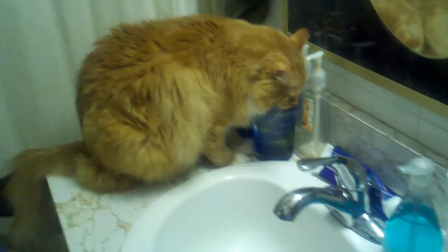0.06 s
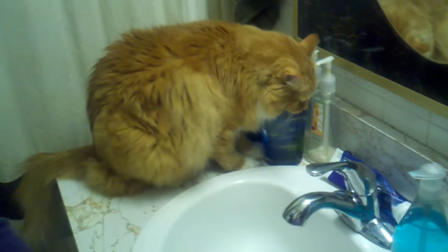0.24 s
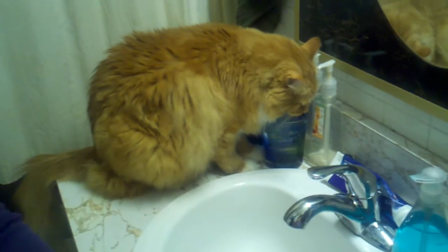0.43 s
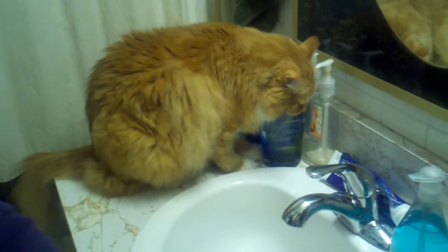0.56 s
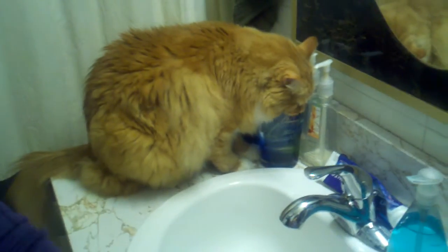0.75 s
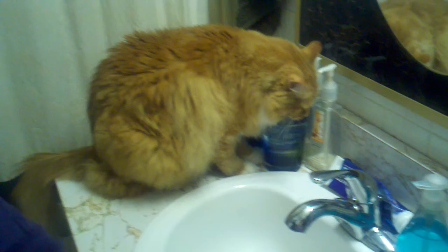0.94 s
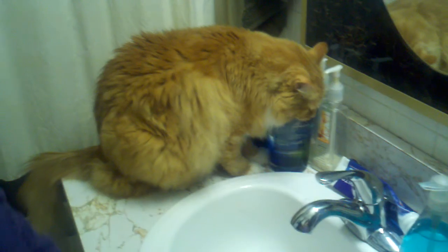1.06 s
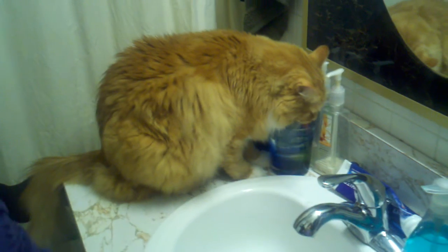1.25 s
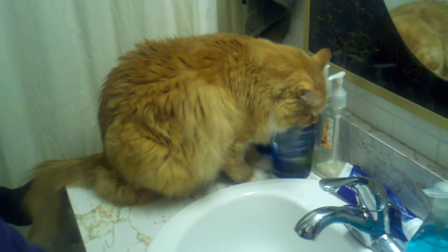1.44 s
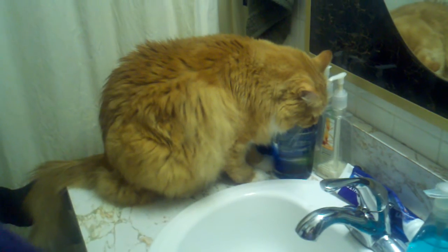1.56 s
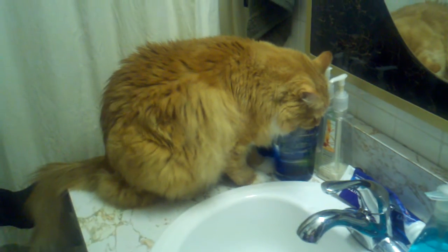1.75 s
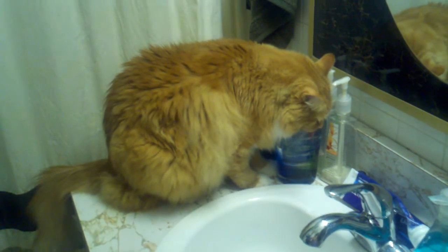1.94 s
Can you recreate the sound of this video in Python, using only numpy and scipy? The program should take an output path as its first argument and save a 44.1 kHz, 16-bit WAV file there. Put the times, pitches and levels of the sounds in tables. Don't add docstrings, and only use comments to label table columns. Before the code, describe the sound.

A cat laps water from a glass, with uneven clusters of bubbly plops, wet snaps and pinging droplets. A small tiled bathroom adds a short bright tail; the nearby microphone has soft hiss and catches one late dry tick.

```python
import sys
import numpy as np
from scipy import signal
from scipy.fft import rfft, irfft
from scipy.io import wavfile
from scipy.ndimage import uniform_filter1d

SR = 44100
rng = np.random.default_rng(int(sys.argv[2]) if len(sys.argv) > 2 else 0)


def store_pcm(level_fs):
    pcm = np.round(np.clip(level_fs, -1, 1) * 32767).astype(np.int16)
    wavfile.write(sys.argv[1], SR, np.atleast_2d(pcm).T)


def invert_db(x):
    u = np.asarray(x, float) / 20
    return 10 ** u


N = 88200
LEAD = SR // 5
WATER_CUT_HZ = 590


def rms_one(x):
    return x / np.sqrt(np.mean(x ** 2) + 1e-20)


def fade(t, t60):
    return np.exp(-np.log(1000) * t / max(t60, 1e-3))


def swell(t, attack, t60):
    return (1 - np.exp(-t / attack)) * fade(t, t60)


def high_pass(x, hz, order):
    return signal.sosfilt(signal.butter(order, hz, "high", fs=SR, output="sos"), x)


def resonate(x, peaks):
    out = 0
    for k, (hz, width, db) in enumerate(peaks):
        r = np.exp(-np.pi * width / SR)
        zeros = [(1 - r * r) / 2, 0, (r * r - 1) / 2]
        poles = [1, -2 * r * np.cos(2 * np.pi * hz / SR), r * r]
        out = out + (-1) ** k * invert_db(db) * signal.lfilter(zeros, poles, x + 1e-18)
    return out


def add(track, start_s, sound):
    i = int(start_s * SR) + LEAD
    track[i:i + len(sound)] += sound[:len(track) - i]


# (pitch_hz, level_db)
HISS_COLOUR = [(29, -22), (50, -16), (125, -6), (371, -2.5), (973, -11.5), (3300, -17), (4560, -21.5),
               (16000, -22)]
# (pitch_hz, level_db)
WHINES = [(1755, -81), (2412, -80.5), (3402, -80.5)]
HISS_DB, WHINE_WIDTH_HZ = -66.5, 30


def background():
    hz = np.maximum(np.arange(N // 2 + 1) * SR / N, 1)
    colour_hz, colour_db = np.transpose(HISS_COLOUR)
    colour = invert_db(np.interp(np.log(hz), np.log(colour_hz), colour_db))
    hiss = irfft(rfft(rng.standard_normal(N)) * colour, N)
    out = invert_db(HISS_DB) * rms_one(hiss)
    for pitch_hz, level_db in WHINES:
        peak = [(pitch_hz, WHINE_WIDTH_HZ, 0)]
        whine = resonate(resonate(rng.standard_normal(N), peak), peak)
        out = out + invert_db(level_db) * rms_one(whine)
    return out


PLOP_CYCLES, PLOP_ATTACK_S, PLOP_RISE = 11.44, 0.001, 0.041


def air_pocket(pitch_hz, t60):
    t = np.arange(SR // 10) / SR
    return swell(t, PLOP_ATTACK_S, t60) * np.sin(2 * np.pi * pitch_hz * (t + PLOP_RISE * t ** 2 / t60))


# (start_s, level_db, pitch_hz, splash_db)
PLOPS = [(0.151, -43.5, 850, -11.5), (0.175, -35.5, 1050, -4), (0.19, -37, 1350, -0.5),
         (0.204, -34.5, 844, -2.5), (0.214, -29, 1760, -27), (0.234, -17.5, 1900, -4.5),
         (0.251, -21, 1830, -10.5), (0.274, -36.5, 1290, 7.5), (0.288, -28.5, 1680, -3),
         (0.297, -15.5, 1120, -15.5), (0.303, -23.5, 1640, -3), (0.305, -28, 1770, -7),
         (0.3168, -19, 1850, -11), (0.378, -28, 1770, -14), (0.417, -35.5, 1930, -11),
         (0.4355, -31.5, 1460, -3.5), (0.502, -37, 1780, -9), (0.607, -38.5, 1010, 0),
         (0.637, -31, 1480, -6.5), (0.689, -25.5, 1550, -9.5), (0.701, -25, 1110, -5),
         (0.7115, -25.5, 1020, -3), (0.812, -37, 1120, 5), (0.823, -19, 1767, -16),
         (0.976, -44, 1610, -2), (1.002, -29, 846, -8), (1.04, -57.5, 810, 15),
               (1.112, -44, 1410, -7), (1.143, -28.5, 875, -3.5), (1.201, -27.5, 1230, -7),
               (1.229, -38, 1300, -5), (1.256, -45, 912, 5), (1.28, -41.5, 880, 3),
               (1.295, -29.5, 2140, -5.5), (1.306, -41.5, 2130, 0), (1.328, -27, 2430, -16),
               (1.338, -40.5, 1075, 2), (1.354, -39.5, 1140, 0.5), (1.367, -31, 2200, -3),
               (1.393, -45.5, 747, 10.5), (1.412, -43, 1310, 3), (1.479, -31.5, 857, 1),
               (1.489, -33.5, 1820, -3.5), (1.53, -34, 890, -2.5), (1.544, -22, 1640, -5),
               (1.57, -31.5, 1940, -2.5), (1.661, -46, 712, 3.5), (1.697, -44, 723, -2),
               (1.77, -53, 730, 6.5),
         (0.2278, -17, 1750, -10.5),
    (0.321, -25, 1730, -7.5),
    (0.646, -41, 1270, 4),
    (0.679, -35, 1000, 2),
    (0.719, -30.5, 1050, -35),
    (1.062, -48.5, 2290, -5.5),
    (1.181, -40.5, 2300, -14),
    (1.558, -36, 1300, 1.5),
    (1.590, -49, 1060, 10.5),
    (0.611, -50, 3600, 8),
]
# (pitch_hz, width_hz, level_db)
LOW_GLASS_AIR = [(834, 200, -4), (1310, 290, -3), (1750, 860, -2), (2200, 996, -4.5)]
EARLIER_LAP = (-0.14, -4, 1190, 0)
PLOP_TRIM_DB, OVERTONE_DB, OVERTONE_RATIO = 4, -32, 1.67
CHURN_WIDTH, CHURN_DB = 0.17, 1.5
SPLASH_T60_S, SPLASH_ATTACK_S, SPLASH_DB, SPLASH_LUMP_DB = 0.056, 0.0011, -1.5, 1
SLOSH_HZ, SLOSH_WIDTH_HZ, SLOSH_DB, SLOSH_T60_S, SLOSH_ATTACK_S = 305, 470, -20.5, 0.087, 0.0073


def plops():
    out, splash, slosh = np.zeros((3, N + LEAD))
    rows = PLOPS + [EARLIER_LAP]
    t = np.arange(SR // 10) / SR
    for start_s, level_db, pitch_hz, splash_db in rows:
        gain, t60 = invert_db(level_db + PLOP_TRIM_DB), PLOP_CYCLES / pitch_hz
        overtone = invert_db(OVERTONE_DB) * air_pocket(pitch_hz * OVERTONE_RATIO, t60 / 2)
        add(out, start_s, gain * (air_pocket(pitch_hz, t60) + overtone))
        add(slosh, start_s, gain * invert_db(SLOSH_DB) * swell(t, SLOSH_ATTACK_S, SLOSH_T60_S))
        burst = gain * invert_db(splash_db) * swell(t, SPLASH_ATTACK_S, SPLASH_T60_S)
        add(splash, start_s, burst * invert_db(SPLASH_DB))
        churn = burst * rng.standard_normal(len(t))
        add(out, start_s, 2 * resonate(churn, [(pitch_hz, CHURN_WIDTH * pitch_hz, CHURN_DB)]))
    lumps = invert_db(SPLASH_LUMP_DB * rms_one(uniform_filter1d(rng.standard_normal(N + LEAD), size=130)))
    out = out + 2 * resonate(splash * lumps * rng.standard_normal(N + LEAD), LOW_GLASS_AIR)
    body = [(SLOSH_HZ, SLOSH_WIDTH_HZ, 0)]
    dull = resonate(resonate(slosh * rng.standard_normal(N + LEAD), body), body)
    return high_pass(out, WATER_CUT_HZ, order=4) + dull


# (start_s, level_db, spray_db above the glass ring)
SNAPS = [(0.1476, -44.5, -9), (0.174, -40.5, -21), (0.1804, -44, -4.5), (0.192, -45, -21),
         (0.2065, -33.5, -17), (0.2142, -45, -3), (0.228, -26, -31), (0.244, -25, -9),
         (0.273, -28.5, -12), (0.3015, -26, -15), (0.3163, -34, -4.5), (0.367, -46, -3),
         (0.377, -36.5, -8), (0.4348, -37.5, -14), (0.606, -51, 3), (0.625, -42.5, -11),
         (0.636, -41, -8.5), (0.6665, -37.5, -14), (0.6711, -38, -22), (0.6862, -27, 2.5),
         (0.7004, -53, -22), (0.8125, -38, -25), (0.8225, -34.5, -14),
         (1, -35, -20), (1.0192, -45.5, -3), (1.11, -52, -9), (1.1374, -55, -17),
               (1.1421, -39.5, -39), (1.2006, -29.5, -11), (1.204, -64, -24), (1.222, -48, -27),
               (1.294, -34, -8), (1.3064, -39.5, -14), (1.328, -36, -8), (1.341, -37, -18),
               (1.367, -36, -11.5), (1.384, -39, -15), (1.3963, -43, -11), (1.4382, -41.5, -15.5),
               (1.4661, -46, -13), (1.478, -42, -16), (1.4913, -40.5, -23), (1.5266, -50, -15),
               (1.542, -37.5, -14), (1.5484, -22, -7.5), (1.646, -50, 9.5),
         (0.236, -28, -4),
    (0.291, -38, -2.5),
    (.322, -33, -29),
    (0.61, -56, 3),
    (0.861, -48, -20),
    (1.559, -32.5, -3.5),
]
# (pitch_hz, width_hz, level_db)
HIGH_GLASS_AIR = [(3070, 810, -4.5), (3710, 383, 2.5), (4400, 590, 0.87), (5510, 1630, -17.5)]
# (pitch_hz, width_hz, level_db)
SPRAY_COLOUR = [(7000, 900, 3), (9560, 1320, 0), (11170, 2600, -5.5), (15900, 2200, -10.5)]
SNAP_T60_S, SPRAY_T60_S, SNAP_TRIM_DB, SPRAY_TRIM_DB = 0.012, 0.012, 4.5, 8.5
SNAP_ATTACK_S, BREAK_DB = 0.00078, 8.5
CRACKLE_DB, CRACKLE_T60_S, CRACKLES_PER_S = -14.5, 0.08, 1080


def snaps():
    ring, spray = np.zeros((2, N + LEAD))
    t = np.arange(SR // 10) / SR
    rise = 1 - np.exp(-t / SNAP_ATTACK_S)
    first_break = invert_db(BREAK_DB) * (np.arange(len(t)) == SR // 2000)
    for start_s, level_db, spray_db in SNAPS:
        ring_noise, spray_noise = rng.standard_normal((2, len(t)))
        crackles = rng.random(len(t)) < CRACKLES_PER_S / SR
        grains = signal.lfilter([1], [1, -.97], crackles)
        trail = invert_db(CRACKLE_DB) * grains * fade(t, CRACKLE_T60_S)
        ring_shape = first_break + rise * (fade(t, SNAP_T60_S) + trail)
        spray_shape = first_break / 2 + rise * (fade(t, SPRAY_T60_S) + trail)
        add(ring, start_s, invert_db(level_db + SNAP_TRIM_DB) * ring_shape * ring_noise)
        add(spray, start_s, invert_db(level_db + spray_db + SPRAY_TRIM_DB) * spray_shape * spray_noise)
    ringing = high_pass(resonate(ring, HIGH_GLASS_AIR) * 2, 1300, order=2)
    return ringing + high_pass(resonate(spray, SPRAY_COLOUR), 5350, order=2)


# (start_s, level_db, pitch_hz, fade_cycles)
DROPS = [(.2303, -27, 4350, 16), (.2385, -30, 1920, 12), (.2458, -23, 3900, 12),
         (.2742, -28, 3720, 29), (.3085, -14, 1780, 13), (0.313, -22, 1500, 7.1),
         (0.315, -25, 4400, 14), (.322, -25.5, 4230, 18), (.3245, -38, 1990, 17),
         (0.329, -16, 1300, 4.6), (0.4269, -41, 1160, 16), (0.436, -42, 2140, 19),
         (.444, -37, 1920, 15), (.460, -32, 3800, 10), (0.506, -39, 1800, 14), (0.666, -45, 3600, 12),
         (0.672, -41, 3800, 18), (.682, -38, 3900, 13), (.606, -44, 3800, 91),
         (.609, -28.5, 1050, 6.4), (.638, -42, 3850, 14), (0.712, -23, 1040, 7.5),
         (.8145, -48, 4200, 16), (0.815, -34.5, 7000, 25), (.8235, -42, 4430, 21),
         (.701, -28, 3920, 14), (0.7154, -32, 1130, 8), (.7255, -30, 1140, 7.1),
         (1.2954, -29, 4150, 13), (1.3082, -50, 4200, 12), (1.002, -31, 3580, 17),
               (1.18, -53, 2300, 15), (1.2002, -27, 4400, 11), (1.3285, -28.5, 7600, 23),
               (1.3412, -34.5, 4200, 14), (1.3675, -28, 4540, 18), (1.367, -36, 7140, 23),
               (1.374, -40, 2200, 15), (1.384, -34.5, 7000, 26), (1.5493, -21, 4300, 9),
               (1.482, -28, 1730, 9), (1.663, -47, 706, 40),
         (.3016, -16, 1900, 6),
    (.3017, -24, 4300, 16),
    (.6856, -21, 4000, 18),
    (.6857, -23, 7200, 24),
    (.6858, -25, 9800, 28),
    (.6859, -28, 14000, 36),
    (1.3283, -31, 5000, 18),
    (1.647, -39, 7200, 25),
    (1.6472, -45, 5400, 14),
    (1.7712, -48, 850, 14),
]
DROP_ATTACK_S, DROP_RISE = .0003, .05


def drops():
    out, t = np.zeros(N + LEAD), np.arange(SR // 20) / SR
    for start_s, level_db, pitch_hz, fade_cycles in DROPS:
        t60 = fade_cycles / pitch_hz
        ping = np.sin(2 * np.pi * pitch_hz * t * (1 + DROP_RISE * t / t60))
        add(out, start_s, invert_db(level_db) * swell(t, DROP_ATTACK_S, t60) * ping)
    return high_pass(out, WATER_CUT_HZ, order=2)


# (low_hz, high_hz, level_db, t60_s)
TILE_BANDS = [(144, 400, -2.5, 0.21), (717, 1010, -5.5, 0.24), (1250, 2200, -5, 0.22),
              (2940, 4600, -7.5, 0.23), (5470, 21000, -6.5, 0.19)]
ROOM_GAP_S, ECHO_PATCHY_DB = .0045, 3


def bathroom(x):
    t = np.arange(SR // 2) / SR
    lumps = invert_db(ECHO_PATCHY_DB * rms_one(uniform_filter1d(rng.standard_normal(len(t)), size=90)))
    onset = np.clip(t / ROOM_GAP_S - 1, 0, 1)
    mean_fade = fade(t, .28)
    spectrum = rfft(rng.standard_normal(len(t)) * lumps * onset * mean_fade)
    even = irfft(spectrum / np.sqrt(uniform_filter1d(np.abs(spectrum) ** 2, size=11)), len(t))
    echoes = even * onset * (t < .4) / np.sqrt(np.sum(even ** 2))
    tail = 0
    for low_hz, high_hz, level_db, t60 in TILE_BANDS:
        band = signal.butter(2, [low_hz, high_hz], "band", fs=SR, output="sos")
        tail = tail + invert_db(level_db) * fade(t, t60) / mean_fade * signal.sosfilt(band, echoes)
    return signal.fftconvolve(x, tail)[:len(x)]


# (pitch_hz, level_db, t60_s)
TICK_MODES = [(1300, -16, 0.0036), (1920, 9.5, 0.0042), (2300, 2, 0.0052), (3010, 1, 0.0062),
              (3800, -5.5, 0.0058), (4200, -7, 0.01), (5200, -6, 0.003), (5860, -4, 0.0024),
              (7250, -8.5, 0.0049), (9100, -4, .002)]
TICK_S, TICK_DB, TICK_ATTACK_S, TICK_CUT_HZ = 1.7427, -23.5, 0.00021, 510


def tick():
    out, t = np.zeros(N + LEAD), np.arange(SR // 40) / SR
    for k, (pitch_hz, level_db, t60) in enumerate(TICK_MODES):
        mode = swell(t, TICK_ATTACK_S, t60) * np.sin(2 * np.pi * pitch_hz * t)
        add(out, TICK_S, (-1) ** k * invert_db(TICK_DB + level_db) * mode)
    return high_pass(out[LEAD:], TICK_CUT_HZ, order=2)


def scene():
    glass = plops() + snaps() + drops()
    in_room = (glass + bathroom(glass))[LEAD:]
    return (in_room + tick() + background())[None]


def low_pass(x):
    return signal.sosfilt(signal.butter(12, 16650, fs=SR, output="sos"), x)


def record(dry):
    top_cut = signal.cheby2(10, 60, 16800, fs=SR, output="sos")
    return low_pass(signal.sosfilt(top_cut, dry))


dry = scene()
out = record(dry)
store_pcm(out)
```